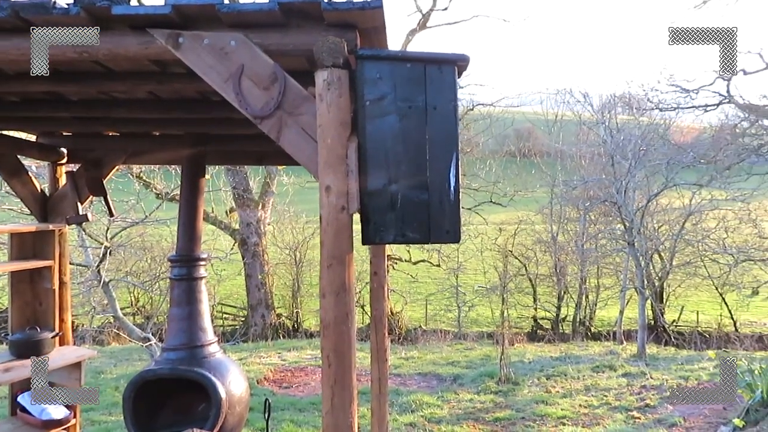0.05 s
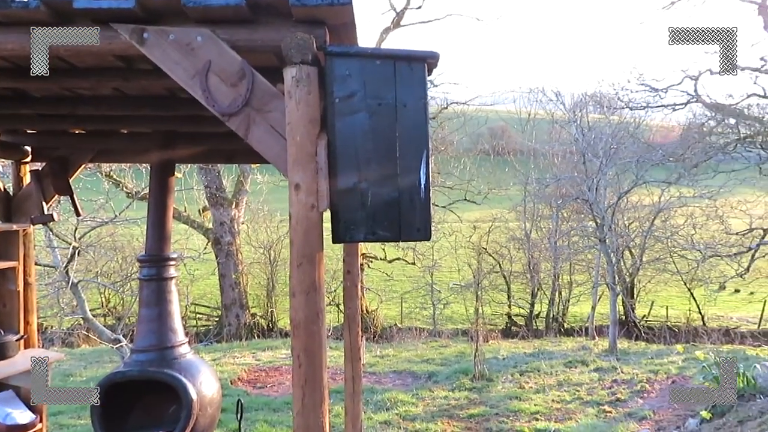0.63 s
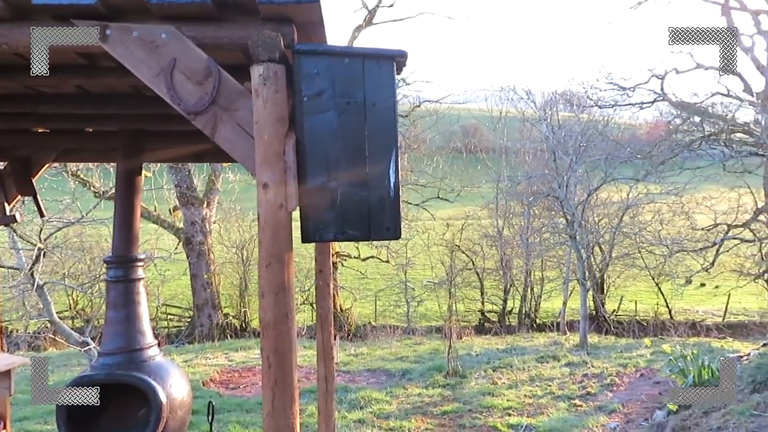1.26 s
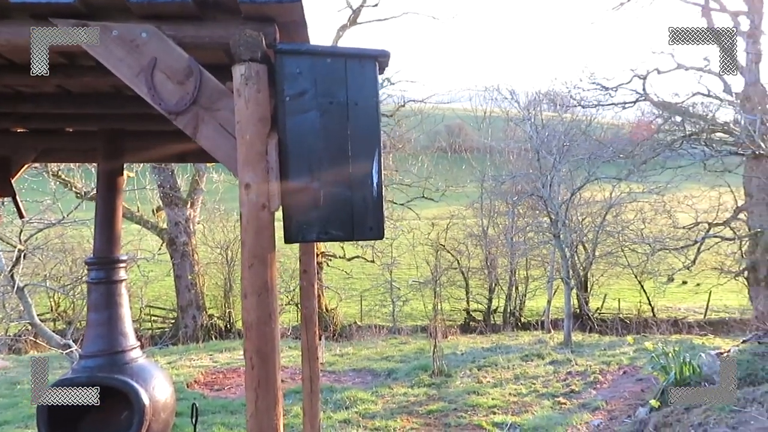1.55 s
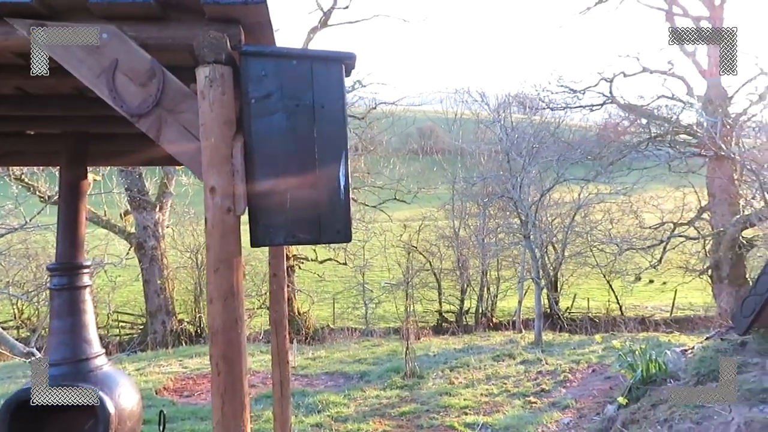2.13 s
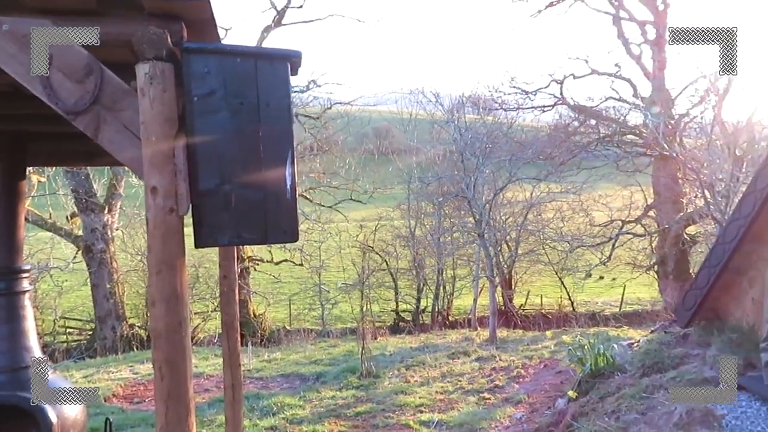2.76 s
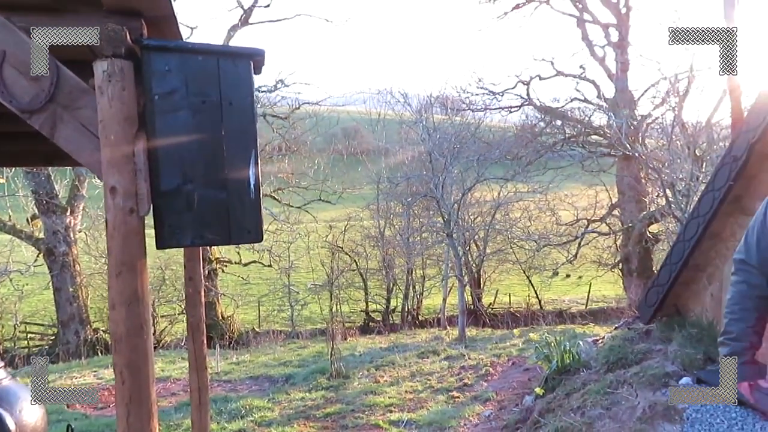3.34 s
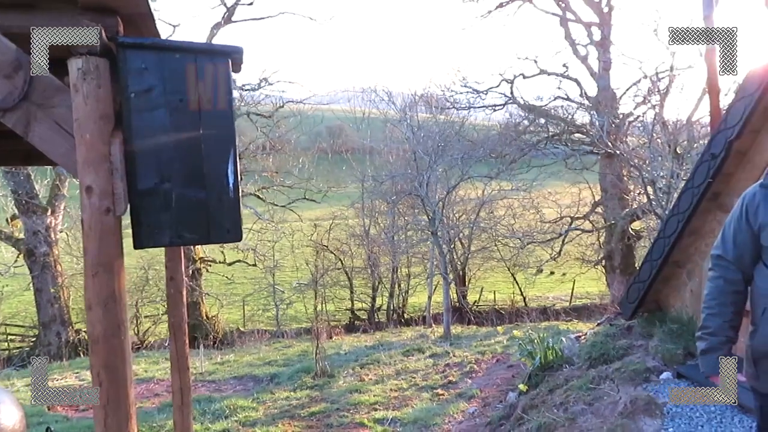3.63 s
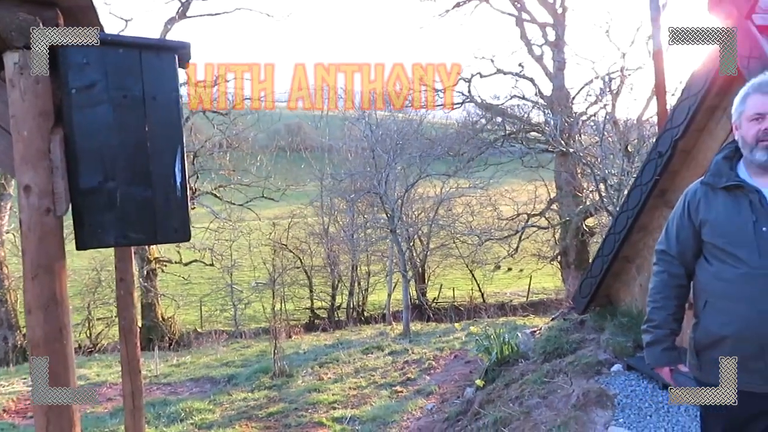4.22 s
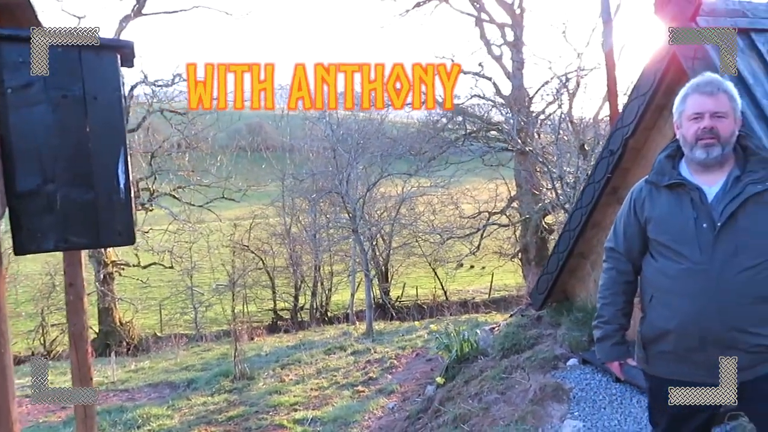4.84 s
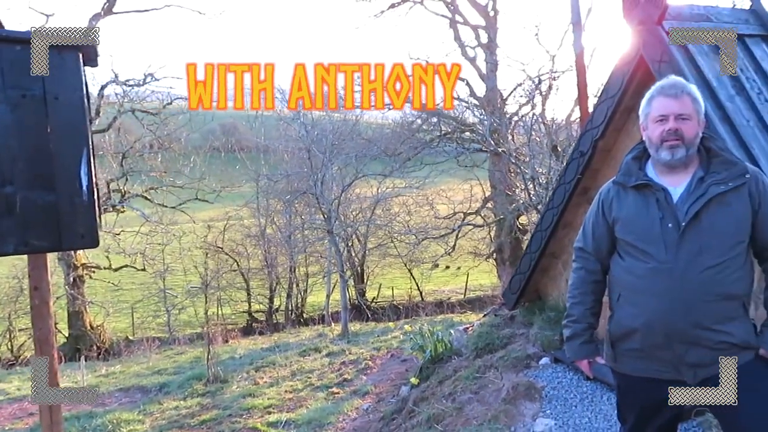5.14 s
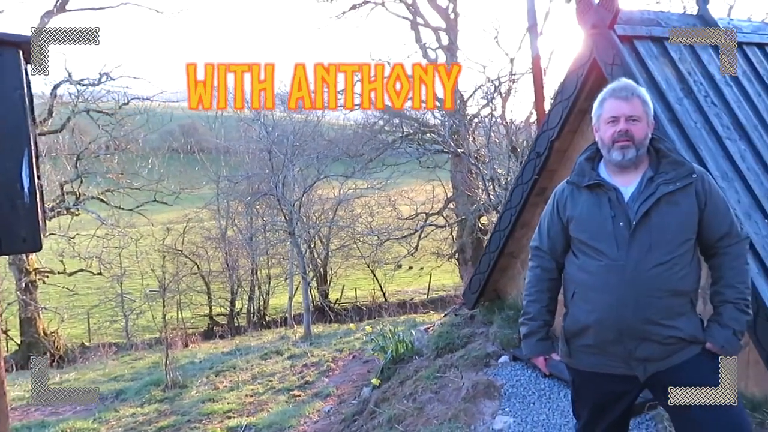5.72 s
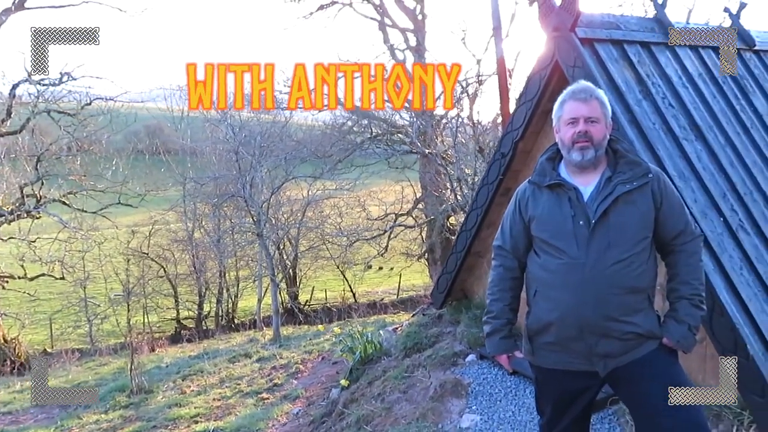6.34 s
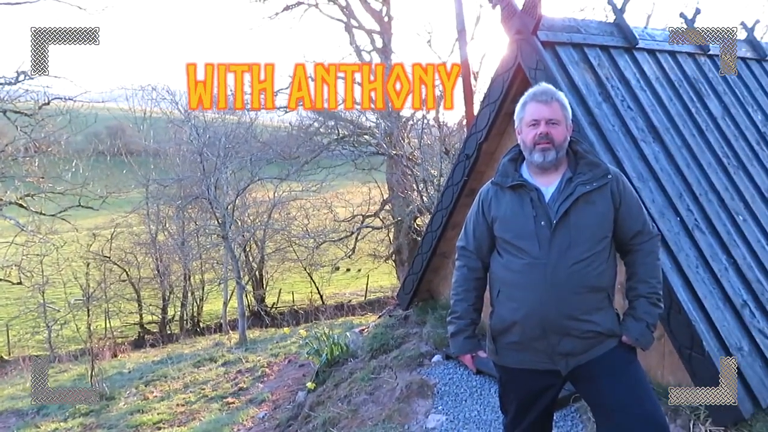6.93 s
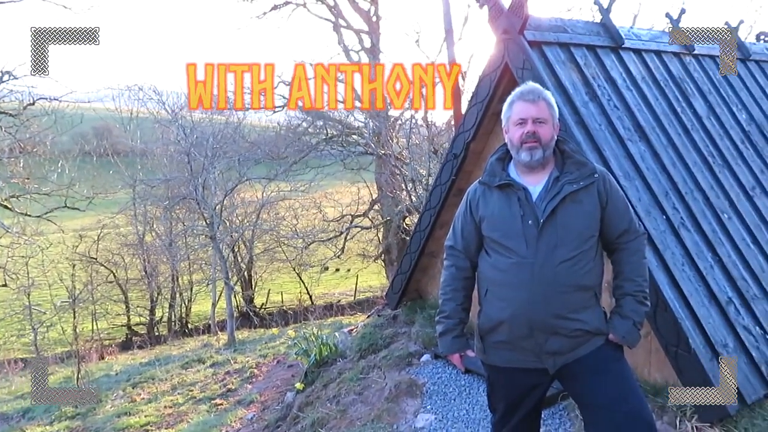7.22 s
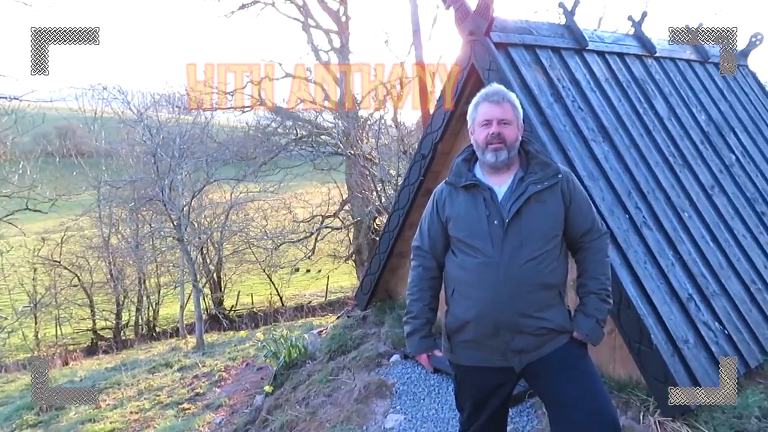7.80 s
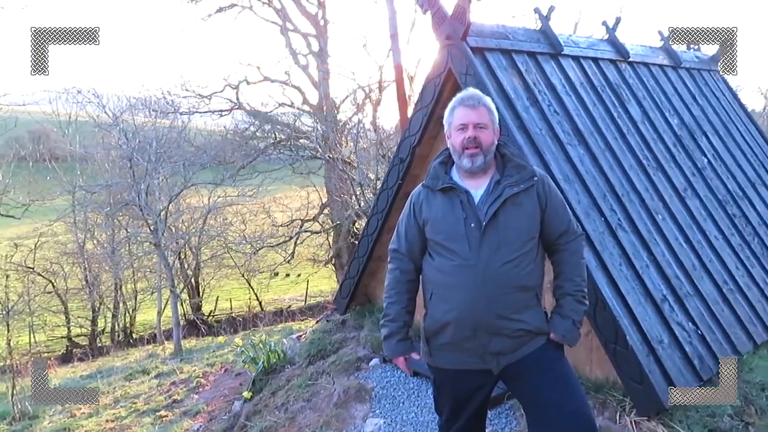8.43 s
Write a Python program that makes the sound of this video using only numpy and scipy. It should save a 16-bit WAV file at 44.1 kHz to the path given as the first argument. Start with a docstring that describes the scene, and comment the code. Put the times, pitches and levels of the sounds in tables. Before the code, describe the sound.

A crow caws three times while small songbirds whistle and chirp over soft country air and a faint low hum.

```python
"""Crow by a timber shelter.

A crow caws three times on a quiet hillside: uneven syrinx pulses and breath, shaped by throat and beak.
Songbirds chirp, whistle, twitter, squeak, trill and warble in gliding tones over soft country air
and a far low hum, both shaped noise. Timber walls colour the calls; trees and valley throw them back."""
import sys
import numpy as np
from scipy import signal
from scipy.fft import rfft, irfft
from scipy.io import wavfile
from scipy.ndimage import uniform_filter1d

SR = 44100
rng = np.random.default_rng(int(sys.argv[2]) if len(sys.argv) > 2 else 0)


def wrap_up_sound(samples):
    """Save the sound to the file named by the first command line argument, as 16-bit audio."""
    columns = np.atleast_2d(samples).T
    # keep every value between -1 and 1, then stretch to whole-number steps
    tamed = np.clip(columns, -1, 1)
    steps = np.round(tamed * 32767).astype(np.int16)
    wavfile.write(sys.argv[1], SR, steps)


N = 382347

# air spectrum (frequency [Hz], relative density [dB])
AIR_SPECTRUM = [(15, -67), (25, -18), (128, -4.5), (264, -2), (301, -3), (335, -2), (373, -1.5), (952, -8),
                (1030, -9), (1310, -8.5), (1500, -11), (2560, -17), (7680, -27), (8320, -28.5),
                (15000, -39.5)]
# slow swell of the air (time [s], level [dB])
AIR_SWELL = [(.25, -56.5), (.75, -52.5), (1.7, -53), (2.3, -56.5), (3.75, -52), (4.2, -55), (5.45, -52.5),
             (6.25, -60.5), (6.7, -53.5), (7.7, -53), (8.4, -60)]
# air between the ears (frequency [Hz], correlation [-1..1])
AIR_CORRELATION = [(60, 1), (150, 0.61), (380, -0.44), (950, 0.052), (2380, 0.054), (5970, 0.13),
                   (15000, 0.071)]
# low rumble (time [s], relative level [dB])
RUMBLE_SWELL = [(.4, -67), (1.15, -58.5), (2.35, -68.5), (3.75, -59.5), (4.05, -66), (4.7, -58), (5.5, -61),
                (5.95, -69), (7.6, -62), (8.4, -73)]
# far hum (time [s], relative level [dB])
HUM_SWELL = [(0, -62), (2.9, -65), (3.4, -57.5), (4.45, -59), (4.8, -49.5), (6.35, -61), (6.75, -52),
             (7.3, -51), (7.65, -46.5), (8.2, -58.5)]

# single chirps (time [s], length [s], start [Hz], middle [Hz], end [Hz], level [dB], buzz depth [Hz])
CHIRPS = [(0, 0.058, 8400, 8210, 8370, -50, 60), (0.347, 0.017, 2800, 3030, 3100, -55, 102),
          (.388, 0.015, 5800, 5540, 5300, -55, 2), (0.413, .05, 3330, 3170, 3200, -51, 40),
          (1.37, 0.033, 1520, 1580, 1640, -52.5, 60), (2.497, 0.016, 4000, 3490, 3120, -43.5, 380),
          (2.937, 0.078, 4550, 4600, 4460, -62, 33), (2.963, .19, 636, 616, 597, -57, 11),
          (3.367, 0.019, 3450, 3610, 3840, -39, 150), (3.7, .016, 4240, 3800, 3640, -44, 102),
          (3.816, 0.14, 4700, 4470, 4300, -62, 64), (3.973, 0.013, 3100, 2770, 2650, -45, 1),
          (4.14, 0.018, 3120, 2760, 2530, -40.5, 152), (4.349, .022, 3470, 3340, 3300, -42.5, 98),
          (4.354, 0.048, 3860, 4010, 4140, -40.5, 30), (4.406, 0.029, 4140, 3930, 3800, -39, 34),
          (4.478, 0.027, 3760, 3290, 3400, -43, 105), (4.492, 0.04, 4020, 4090, 4090, -38.5, 35),
          (5.136, 0.021, 4270, 3970, 3860, -47.5, 103), (5.262, .08, 1368, 1285, 1230, -49.5, 10),
          (5.255, 0.12, 3480, 3490, 3630, -57.5, 21.5), (5.323, .044, 7300, 7070, 6650, -48, 4),
          (5.813, 0.044, 3810, 4400, 4700, -58, 400), (6.147, .026, 1290, 1194, 1230, -53, 22),
          (6.16, 0.059, 1754, 2354, 3240, -53, 254), (8.652, 0.059, 1610, 1710, 1700, -43, 103)]

# rising whistles (start [s], lowest point [s], flick [s], flick rise [s], lowest pitch [Hz],
# flick top [Hz], climb level [dB], octave level [dB], flick level [dB])
WHISTLES = [(.42, .69, .943, .05, 1649, 2542, -50.5, -57, -38),
            (1.369, 1.508, 1.787, .034, 1633, 2690, -52, -52, -38.5),
            (2.251, 2.39, 2.694, .042, 1560, 2650, -52, -53.5, -38)]
LEAD_HZ, KNEE_HZ, CLIMB_POWER = 69.3, 1.96e3, 1.4  # starts above the lowest pitch, climbs to the knee
THROB_DB, THROB_SPAN, CLIMB_DB = 5, .8, 5.5  # span: period as a share of the climb
OCTAVE_THROB_DB, OCTAVE_SPAN, OCTAVE_FADE_DB, OCTAVE_LATE_DB, OCTAVE_LATE_S = 3, 0.53, -17, -6, 0.15
FLICK_S, FLICK_DROOP_HZ, FLICK_FADE_DB, FLICK_ATTACK_S = .097, 268, -6.5, .008

# thin twitters (time [s], opening [s], zigzag [s], length [s], level [dB], fade per zigzag [dB])
TWITTERS = [(0.448, .033, .067, 0.25, -42, -14), (1.042, .064, .063, .298, -42, -12)]
TWITTER_HZ, ZIGZAG_HZ, OPENING_HZ, OPENING_DB, SETTLE_S, SETTLE_DB = 7740, 720, 8580, -5, .018, 3.5

# caws (time [s], length [s], pitch [Hz], scoop time [s], sag [share], effort [dB], push at gape [dB],
# rasp [dB], beak widest [share of call], upper throat band there [dB])
CAWS = [(3.169, 0.4, 168.1, 0.022, 0.094, -27.5, 0.1, -12.5, 0.83, -2),
        (4.606, 0.42, 174.3, 0.041, 0.07, -25.5, .5, -13, 0.84, 0),
        (7.108, .405, 168.7, .023, .058, -25.5, 1, -12.5, 0.77, 1)]
# crow's throat response (frequency [Hz], gain [dB])
THROAT_RESPONSE = [(170, -60), (310, -18.5), (490, -12.5), (620, -17), (850, -6), (980, -9.5), (1150, -1.5),
                   (1450, -6), (1750, -5), (2020, -0.5), (2200, -10), (2600, -14), (3200, -40), (5000, -62)]
# rasp above the throat band (frequency [Hz], gain [dB])
RASP_RESPONSE = [(1800, -27), (2500, -10.5), (2950, 0), (3380, 5), (3600, -8.5), (4450, -9), (4850, -2.5),
                 (5450, -10), (6100, -4), (6500, -8), (7100, -10), (8600, -20), (15000, -28.5)]
# peaks where timber echoes add up (frequency [Hz], width [Hz], gain [dB])
TIMBER_PEAKS = [(1182, 32, 3.5), (1360, 150, 3), (1421, 105, 9), (1561, 45, 9), (1751.5, 165, 16),
                (1902, 32, 11), (2005, 43, 11)]
# low harmonics that stay clear in a caw (harmonic [number], level re effort [dB])
CLEAR_HARMONICS = [(2, -23.5), (3, -22), (4, -25), (5, -21), (6, -24)]
SCOOP_SHARE, DROP_SHARE, DROP_S = .14, .115, .04
ONSET_DB, ONSET_S, RELEASE_DB, RELEASE_S, RASP_FADE_DB = -7.5, 0.014, -11, .05, -3.5
BEAK_SHUT_DB, BEAK_OPEN_S = -7, 0.094

# nasal squeaks (time [s], length [s], start [Hz], middle [Hz], end [Hz], level [dB])
SQUEAKS = [(3.98, 0.059, 483, 492, 477, -47), (4.155, 0.059, 505, 477, 445, -44.5)]
# squeak spectrum (frequency [Hz], relative level [dB])
SQUEAK_SPECTRUM = [(1400, -21), (1900, -4), (2900, -11), (3350, -14), (3850, 0.5), (4400, -23), (5500, -31)]

# trills (first note [s], last note [s], step [s], first pitch [Hz], last pitch [Hz],
# sweep each way [share of pitch], peak [dB], loudest point [share of run])
TRILLS = [(5.068, 5.157, .022, 2320, 2470, .15, -38, 0.14),
          (5.158, 5.246, .024, 6770, 4730, .04, -48, 0.62),
          (6.723, 6.926, .026, 7900, 4970, .075, -45.5, 1)]
TRILL_NOTE_S, TRILL_FADE_DB, TRILL_BEND_POWER, TRILL_BUZZ_SHARE = .014, -10.5, 1.29, 0.05

# high warbles (time [s], length [s], pitch [Hz], level [dB])
WARBLES = [(6.451, 0.055, 7050, -45.5), (6.624, .06, 7300, -48), (7.076, 0.044, 7340, -49)]
LEAP_HZ, LEAP_S, WARBLE_HZ, WARBLE_DEPTH_HZ = 1895, 0.0084, 52, 300

# shelter echo (frequency [Hz], T60 [s])
SHELTER_T60 = [(200, 0.5), (1500, 0.34), (4000, 0.43), (8000, 0.19)]
# valley echo (frequency [Hz], T60 [s])
VALLEY_T60 = [(200, 0.6), (1600, 1.43), (2600, 1.02), (4000, 2.2), (8000, 0.76)]


def gain_of(db):
    """Decibels to gain."""
    return 10 ** (np.asarray(db) / 20)


def unit_rms(x):
    """Scale to rms 1."""
    return x / np.sqrt(np.mean(x ** 2) + 1e-20)


def held(x, samples=1100):
    """Hold the running rms at 1: a steady push of air."""
    return x / np.sqrt(abs(uniform_filter1d(x ** 2, samples)) + 1e-12)


def at_hz(table, hz):
    """Table value at hz, on a log-frequency axis."""
    f, value = np.transpose(table)
    return np.interp(np.log(hz + 1), np.log(f + 1), value)


def level_curve(table):
    """Table level at every sample of the scene."""
    return np.interp(np.arange(N) / SR, *np.transpose(table))


def band(x, lo_hz, hi_hz):
    """Steep band-pass."""
    f = np.fft.rfftfreq(x.shape[-1], 1 / SR) + 1e-3
    return irfft(rfft(x) / np.sqrt((1 + (lo_hz / f) ** 20) * (1 + (f / hi_hz) ** 20)), x.shape[-1])


def wander(size, hz):
    """Smooth random drift up to hz, rms about 1."""
    return unit_rms(band(rng.standard_normal(size + SR), 0.95, hz))[:size]


def colour(x, db_at, size=4096):
    """Minimum-phase filter with gain db_at(Hz)."""
    log_gain = np.log(gain_of(db_at(abs(np.fft.fftfreq(size, 1 / SR)))))
    taps = np.fft.ifft(np.exp(np.conj(signal.hilbert(log_gain)))).real
    return signal.fftconvolve(x, taps[:size // 2])[:len(x)]


def phase_of(hz):
    """Running phase of a pitch curve."""
    return 2 * np.pi * np.cumsum(hz) / SR


def arch(length_s, start_hz, middle_hz, end_hz):
    """Pitch parabola through three points."""
    u = np.linspace(-1, 1, max(int(length_s * SR), 64))
    return middle_hz + (end_hz - start_hz) / 2 * u + ((end_hz + start_hz) / 2 - middle_hz) * u ** 2


def air(rumble_db=-0.5, body_db=1, hiss_db=-15, hiss_follows=1.07, patchy_db=1.5):
    """Open-air noise, partly alike in both ears; body and hiss share one swell over a low rumble."""
    frames, hz = N // 512 + 5, np.fft.rfftfreq(2048, 1 / SR)
    a, b, c, d, patches = rng.standard_normal((5, len(hz), frames))
    patches = unit_rms(uniform_filter1d(uniform_filter1d(patches, size=20, axis=0), size=10, axis=1))
    alike = at_hz(AIR_CORRELATION, hz)[:, None]
    left = a + 1j * b
    right = alike * left + np.sqrt(1 - alike ** 2) * (c + 1j * d)
    spectra = np.array([left, right]) * gain_of(at_hz(AIR_SPECTRUM, hz)[:, None] + patchy_db * patches)
    noise = signal.istft(spectra, nperseg=2048, noverlap=1536)[1][:, :N]
    mono = noise.mean(0)
    db = level_curve(AIR_SWELL)
    swell_db = db - db.mean()
    rumble = unit_rms(band(mono, 47, 115)) * gain_of(level_curve(RUMBLE_SWELL) + rumble_db)
    body = band(noise, 115, 2000) / band(mono, 250, 900).std() * gain_of(body_db + swell_db)
    hiss = band(noise, 2000, SR) / band(mono, 9500, 14000).std()
    hiss *= gain_of(hiss_db + hiss_follows * swell_db)
    return rumble + gain_of(db.mean()) * (body + hiss)


def hum(hz=139, width_hz=34, trim_db=-2, spread=0.11, waver_db=0.7):
    """Far wavering drone: noise in one narrow low resonance."""
    f = np.fft.rfftfreq(N, 1 / SR)
    spectra = rfft(rng.standard_normal((2, N))) / (1 + ((f - hz) / width_hz) ** 2) ** 2
    mid, side = unit_rms(irfft(spectra, N))
    db = level_curve(HUM_SWELL) + trim_db + waver_db * wander(N, 5.4)
    return gain_of(db) * np.array([mid + spread * side, mid - spread * side])


def chirp(at_s, length_s, start_hz, middle_hz, end_hz, db, depth_hz, buzz_hz=260, husky=0.86):
    """Quick glide with an uneven, husky buzz on its pitch."""
    hz = arch(length_s, start_hz, middle_hz, end_hz)
    buzz = np.sin(phase_of(buzz_hz * (1 + 0.27 * wander(len(hz), 113))))
    buzz += husky * wander(len(hz), 760)
    tone = np.sin(phase_of(hz + depth_hz * buzz))
    return at_s, gain_of(db) * unit_rms(tone * signal.windows.tukey(len(hz), .5))


def hedge_birds(level_db=-68, count=22):
    """Faint scattered chirps from hedges down the hill."""
    calls = []
    for when, length, pitch, slide, loud in rng.random((count, 5)):
        hz, glide_hz = 2800 + 2200 * pitch, 700 * (slide - .6)
        length_s, db = 0.0262 + 0.073 * length, level_db + 6 * (loud - .5)
        calls.append(chirp(when * N / SR, length_s, hz - glide_hz, hz, hz + glide_hz, db, depth_hz=40))
    return calls


def whistle(at_s, lowest_s, flick_s, rise_s, low_hz, top_hz, level_db, octave_db, flick_db):
    """Slow rising note, flicked up at the end; its octave enters late and dies at the flick."""
    t = np.arange(at_s, flick_s + FLICK_S, 1 / SR)
    climb = np.minimum((t - lowest_s) / (flick_s - lowest_s), 1)
    leap = np.sin(np.pi / 2 * np.clip((t - flick_s) / rise_s, 0, 1))
    push = np.clip(1 + (t - flick_s) / FLICK_ATTACK_S, 0, 1)
    droop = np.clip((t - flick_s - rise_s) / (FLICK_S - rise_s), 0, 1) ** 2
    hz = low_hz + LEAD_HZ * np.sin(np.pi * np.clip(climb, -1, 0)) ** 2
    hz += (KNEE_HZ - low_hz) * np.maximum(climb, 0) ** CLIMB_POWER
    hz += (top_hz - KNEE_HZ) * leap - FLICK_DROOP_HZ * droop
    slow_db = level_db + CLIMB_DB * (climb - .5) + THROB_DB * np.cos(2 * np.pi * climb / THROB_SPAN)
    db = slow_db + (flick_db - slow_db) * push + FLICK_FADE_DB * droop
    upper_db = octave_db + OCTAVE_THROB_DB * np.cos(2 * np.pi * climb / OCTAVE_SPAN)
    upper_db += OCTAVE_FADE_DB * push + OCTAVE_LATE_DB * np.exp(-((t - at_s) / OCTAVE_LATE_S) ** 2)
    phase = phase_of(hz * (1 + .004 * wander(len(t), 90)))
    tone = sum(gain_of(partial_db + 3 * wander(len(t), 46)) * np.sin(k * phase)  # separate flutter
               for k, partial_db in ((1, db), (2, upper_db)))
    return at_s, np.sqrt(2) * tone * signal.windows.tukey(len(t), .03)


def twitter(at_s, opening_s, zigzag_s, length_s, level_db, fade_db,
            buzz_hz=210, depth_hz=160, octave_db=-21):
    """Very high buzzing note that settles into falling zigzags."""
    t = np.arange(0, length_s, 1 / SR) - opening_s
    fall = t / zigzag_s % 1
    settle = np.exp(-(t / SETTLE_S) ** 2)
    hz = np.where(t < 0, OPENING_HZ, TWITTER_HZ - ZIGZAG_HZ * fall + (OPENING_HZ - TWITTER_HZ) * settle)
    db = level_db + np.where(t < 0, OPENING_DB, fade_db * fall ** 2 + SETTLE_DB * settle)
    hz, db = uniform_filter1d(np.array([hz, db]), size=350)
    buzz = np.sin(phase_of(buzz_hz * (1 + 0.2 * wander(len(t), 64))))
    phase = phase_of(hz + depth_hz * buzz + 70 * wander(len(t), 280))
    tone = (np.sin(phase) + gain_of(octave_db) * np.sin(2 * phase)) * (1 + 0.35 * buzz)
    return at_s, gain_of(db) * unit_rms(tone) * signal.windows.tukey(len(t), .06)


def caw_gesture(t, length_s, top_hz, scoop_s, sag, effort_db, push_db, rasp_db, widest, open_db):
    """Pitch scoops, sags and drops as breath ends; the beak opens slowly with a push and shuts fast."""
    u, past_s = t / length_s, t - widest * length_s
    scoop = SCOOP_SHARE * np.exp(-t / scoop_s)
    drop = DROP_SHARE * np.exp((t - length_s) / DROP_S)
    hz = top_hz * (1 - scoop - sag * u - drop)
    gape = np.exp(-(past_s / np.where(past_s < 0, BEAK_OPEN_S, 0.037)) ** 2)
    release = np.clip(1 + (t - length_s) / RELEASE_S, 0, 1) ** 2
    db = effort_db + push_db * gape + ONSET_DB * np.exp(-t / ONSET_S) + RELEASE_DB * release
    upper_db = BEAK_SHUT_DB + (open_db - BEAK_SHUT_DB) * gape
    return hz, db, upper_db, rasp_db + RASP_FADE_DB * u ** 2


def throat_db(hz):
    """Broad throat resonance, rippled by the timber."""
    ripple_db = sum(db / (1 + (2 * (hz - f) / width_hz) ** 2) for f, width_hz, db in TIMBER_PEAKS)
    return at_hz(THROAT_RESPONSE, hz) + ripple_db


def board_bounces(x, delays_s=(.0017, .0029, .0043), bounce=0.29):
    """Quick bounces between boards spread each pulse without changing its colour."""
    f = np.fft.rfftfreq(len(x), 1 / SR)
    trips = np.exp(-2j * np.pi * np.outer(delays_s, f))
    allpass = np.prod((bounce - trips) / (1 - bounce * trips), axis=0)
    return irfft(rfft(x) * allpass / trips[0] / trips[1], len(x))


def caw(at_s, length_s, *gesture, puff_cycles=0.66, low_db=1.5, split_hz=1550, sway_db=1.3):
    """Uneven syrinx pulses, each with a puff of air; harsh at both ends, clearer mid-call."""
    t = np.arange(0, length_s, 1 / SR)
    hz, db, upper_db, rasp_db = caw_gesture(t, length_s, *gesture)
    ends = np.linspace(-1, 1, len(t)) ** 4
    breath_share, jitter_s, shimmer = .11 + .45 * ends, .00004 * (1 + 2 * ends), .17
    cycles = np.cumsum(hz) / SR
    jittered = cycles + hz * jitter_s * wander(len(t), 120)
    pulses = np.diff(np.floor(jittered), prepend=0).clip(0) * np.exp(shimmer * wander(len(t), 185))
    pulses = unit_rms(band(pulses, 1060, SR))
    puffs = unit_rms((0.098 + np.exp(-(jittered % 1) / puff_cycles)) * rng.standard_normal(len(t)))
    voice = colour(np.sqrt(1 - breath_share) * pulses + np.sqrt(breath_share) * puffs, throat_db)
    upper_share = np.clip(gain_of(upper_db) ** 2, .05, .7)  # grows as the beak opens
    low = held(band(voice, 20, split_hz)) * np.sqrt(1 - upper_share) * gain_of(low_db)
    high = held(band(voice, split_hz, SR)) * np.sqrt(upper_share)
    rasp = unit_rms(colour(pulses + 0.6 * puffs, lambda f: at_hz(RASP_RESPONSE, f)))
    clear = np.zeros(len(t))
    for k, harmonic_db in CLEAR_HARMONICS:
        gain = gain_of(harmonic_db + sway_db * wander(len(t), 9.4))
        clear += gain * np.sin(2 * np.pi * (k * cycles + rng.random()))
    sound = board_bounces(low + high + gain_of(rasp_db) * rasp) + clear * (1 - 0.3 * ends)
    attack = 1 - np.exp(-t / .004)
    return at_s, gain_of(db) * sound * attack * signal.windows.tukey(len(t), .06)


def squeak(at_s, length_s, start_hz, middle_hz, end_hz, db):
    """Short nasal stack of harmonics, no fundamental."""
    hz = arch(length_s, start_hz, middle_hz, end_hz)
    phase = phase_of(hz * (1 + 0.011 * wander(len(hz), 200)))
    tone = sum(gain_of(at_hz(SQUEAK_SPECTRUM, k * hz)) * np.sin(k * phase) for k in range(2, 11))
    return at_s, gain_of(db) * unit_rms(tone) * signal.windows.tukey(len(hz), .3)


def trill(first_s, last_s, step_s, first_hz, last_hz, sweep, peak_db, loudest):
    """Run of quick upstrokes, sliding in pitch and level."""
    notes = []
    for u in np.linspace(0, 1, round((last_s - first_s) / step_s) + 1):
        at_s = first_s + u * (last_s - first_s)
        hz = first_hz + (last_hz - first_hz) * u ** TRILL_BEND_POWER
        stroke_hz = hz * (1 - sweep), hz, hz * (1 + sweep)
        db = peak_db + TRILL_FADE_DB * abs(u - loudest)
        notes.append(chirp(at_s, TRILL_NOTE_S, *stroke_hz, db, TRILL_BUZZ_SHARE * hz))
    return notes


def warble(at_s, length_s, pitch_hz, db, husky_hz=200, leap_db=-3):
    """High call that leaps to its pitch and wobbles there."""
    t = np.arange(0, length_s, 1 / SR)
    leap = np.exp(-(t / LEAP_S) ** 4)
    hz = pitch_hz - LEAP_HZ * leap - WARBLE_DEPTH_HZ * (1 - leap) * np.cos(2 * np.pi * WARBLE_HZ * t)
    tone = np.sin(phase_of(hz + husky_hz * wander(len(t), 600))) * gain_of(leap_db * leap)
    return at_s, gain_of(db) * unit_rms(tone * signal.windows.tukey(len(t), .12))


def echo(x, t60_table, delay_s, taps_per_s=3000):
    """Scattered reflections, different in each ear; each band decays at its own rate."""
    taps = rng.standard_normal((2, SR)) * (rng.random((2, SR)) < taps_per_s / SR)
    hz, t, spectra = signal.stft(taps, SR, nperseg=256)
    decay = gain_of(-60 * t / at_hz(t60_table, hz)[:, None])
    tail = signal.istft(spectra * decay, SR, nperseg=256)[1]
    tail *= np.clip(np.arange(tail.shape[1]) / SR / delay_s - 1, 0, 1)
    return signal.fftconvolve(x[None], tail / np.linalg.norm(tail[0]), axes=1)[:, :N]


def perch(calls, left_db, shelter_db, valley_db, spread):
    """Calls from one spot: direct sound, shelter echo and valley echo."""
    x = np.zeros(N)
    for at_s, sound in calls:
        part = x[round(at_s * SR):][:len(sound)]
        part += sound[:len(part)]
    mid, side = echo(x, SHELTER_T60, delay_s=0.0057)
    shelter = gain_of(shelter_db) * np.array([mid + spread * side, mid - spread * side])
    valley = gain_of(valley_db) * echo(x, VALLEY_T60, delay_s=0.035)
    direct = np.array([np.roll(x, 1), x])  # right ear leads by one sample
    return (direct + shelter) * gain_of([[left_db / 2], [-left_db / 2]]) + valley


def scene():
    """Crow and songbirds on their perches, over air and hum."""
    crow = perch([caw(*row) for row in CAWS],
                 left_db=-1.55, shelter_db=-7.5, valley_db=-21.5, spread=0.062)
    whistles = perch([whistle(*row) for row in WHISTLES],
                     left_db=-4.5, shelter_db=-8, valley_db=-12.5, spread=0.4)
    twitters = perch([twitter(*row) for row in TWITTERS],
                     left_db=-0.5, shelter_db=-6.5, valley_db=-30, spread=0.32)
    chirps = perch([chirp(*row) for row in CHIRPS] + [squeak(*row) for row in SQUEAKS],
                   left_db=-3.5, shelter_db=-10, valley_db=-32, spread=0.54)
    song = perch([warble(*row) for row in WARBLES] + [note for row in TRILLS for note in trill(*row)],
                 left_db=-2, shelter_db=-7, valley_db=-29, spread=.7)
    hedges = perch(hedge_birds(), left_db=0, shelter_db=-4, valley_db=-9, spread=1)
    return crow + whistles + twitters + chirps + song + hedges + air() + hum()


def record(dry):
    """Steep low-pass at 15.2 kHz."""
    taps = signal.firwin(511, 15200, window=("kaiser", 9), fs=SR)
    return signal.oaconvolve(dry, taps[None], "same")


dry = scene()
out = record(dry)
wrap_up_sound(out)
```